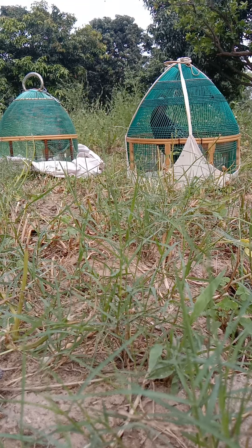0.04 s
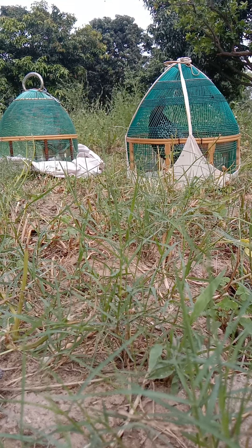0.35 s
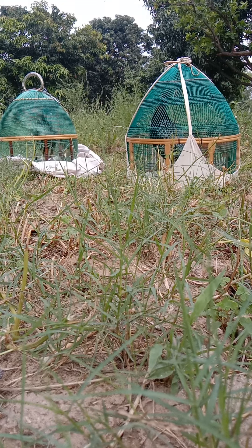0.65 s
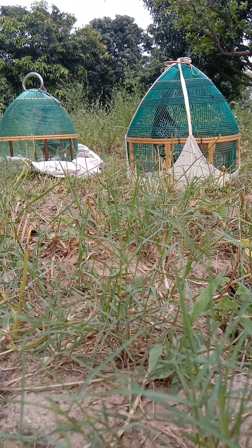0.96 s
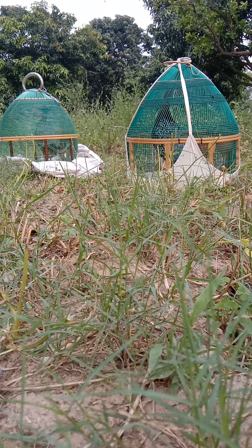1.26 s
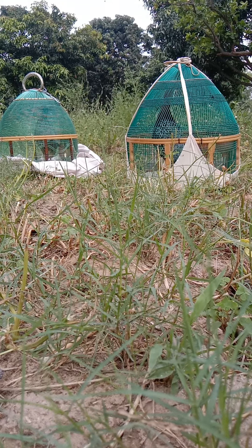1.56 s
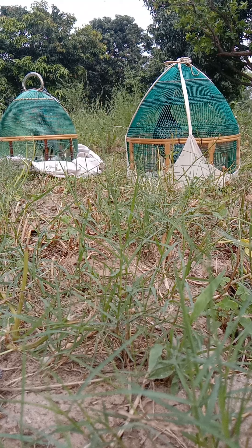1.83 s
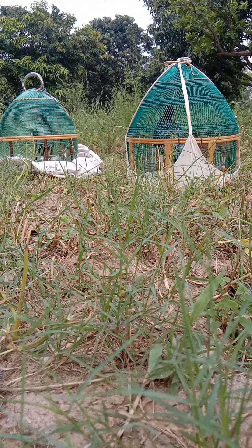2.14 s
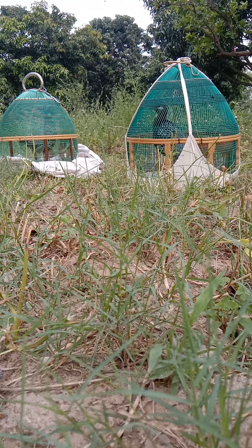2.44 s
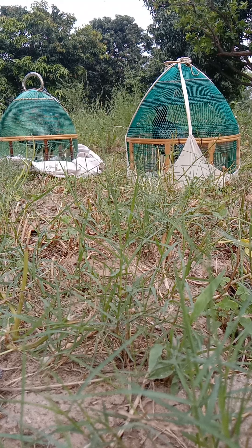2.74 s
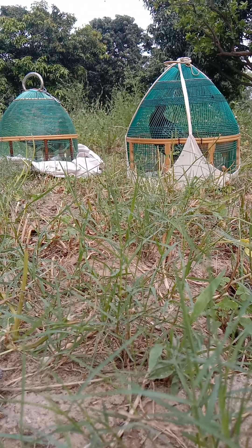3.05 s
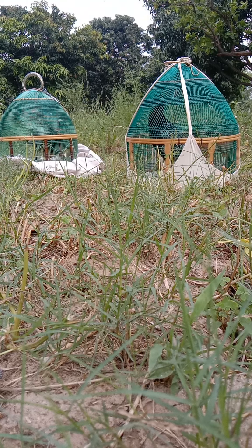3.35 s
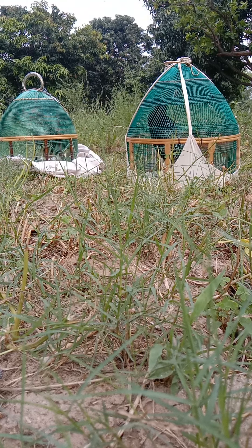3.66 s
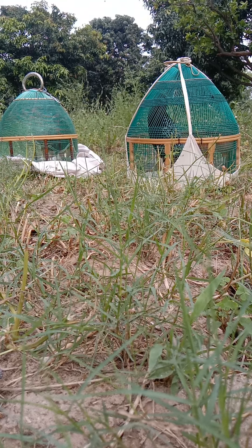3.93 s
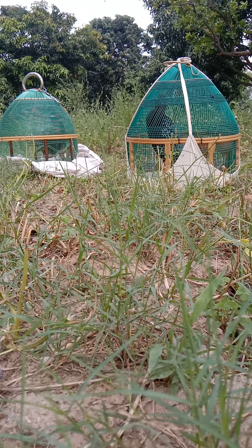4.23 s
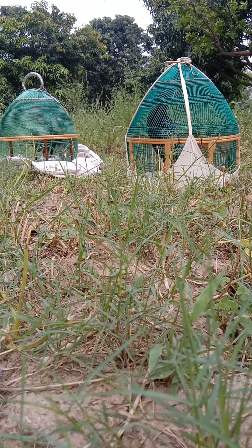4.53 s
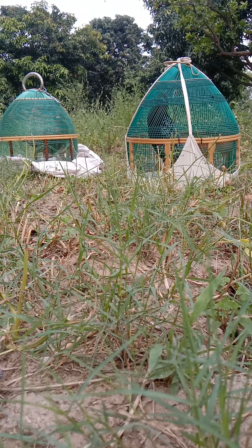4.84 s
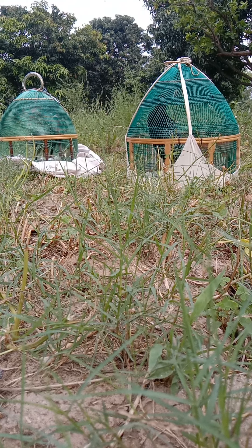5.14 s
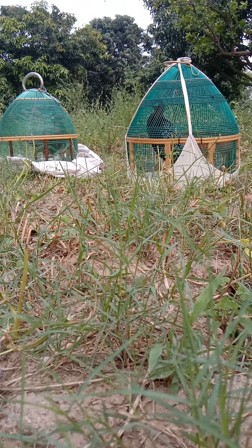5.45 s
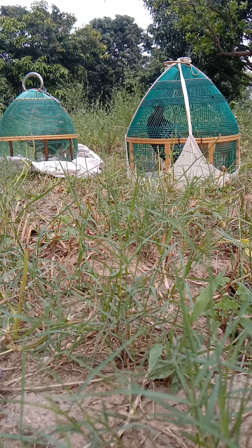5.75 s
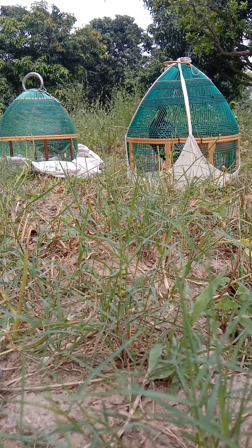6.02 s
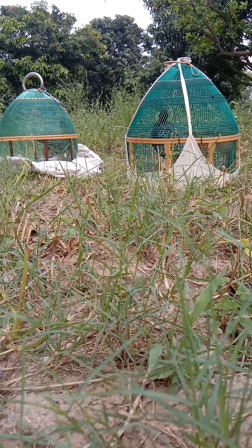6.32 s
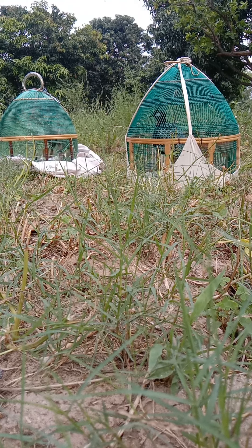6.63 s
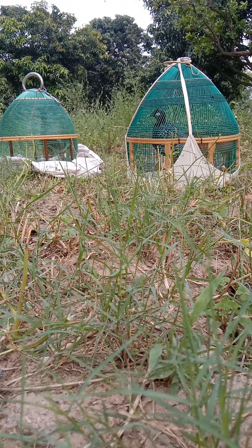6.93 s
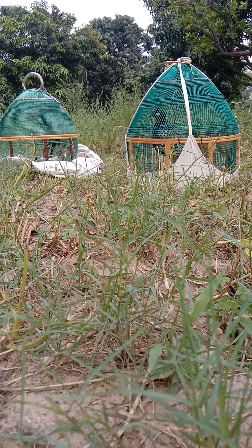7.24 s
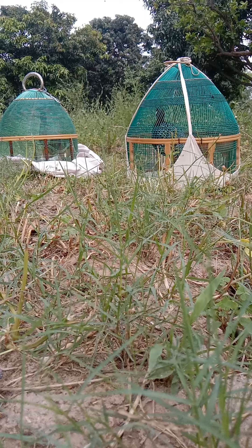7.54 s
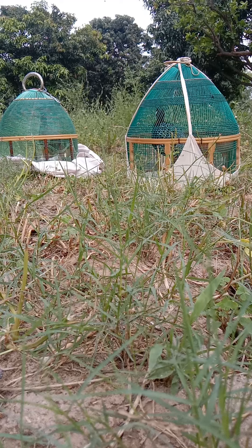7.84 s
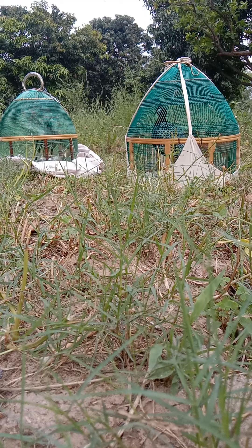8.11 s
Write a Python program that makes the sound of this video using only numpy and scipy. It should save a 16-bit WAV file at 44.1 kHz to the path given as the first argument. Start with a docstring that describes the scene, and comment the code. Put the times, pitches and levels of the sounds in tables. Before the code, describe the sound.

A caged francolin calls twice outdoors, each time a squeaky hiccup followed by four harsh rasping notes, over faint insects and distant birds.

```python
"""In a field, a caged francolin calls twice: a squeaky hiccup, then four harsh rasping notes.
The hiccup is a soft peep, a falling yelp and a high squeal from a membrane in the bird's voice box.
In a rasp the membrane flutters, making a fast train of falling chirps, and now and then it whistles.
The cage scatters the call, and the ground and trees send it back.
Behind it are insects, far birds and a low outdoor rumble."""
import sys
import numpy as np
from scipy import signal
from scipy.fft import rfft, irfft, next_fast_len
from scipy.io import wavfile
from scipy.ndimage import uniform_filter1d, minimum_filter1d, map_coordinates

SR = 44100
rng = np.random.default_rng(int(sys.argv[2]) if len(sys.argv) > 2 else 0)


def log_audio(samples):
    """Write samples as a 16-bit WAV file to the path given in sys.argv[1]."""
    # one column per channel
    frames = np.atleast_2d(samples).T
    # limit to full scale, then quantise
    limited = np.clip(frames, -1, 1)
    pcm = np.round(limited * 32767).astype(np.int16)
    wavfile.write(sys.argv[1], SR, pcm)


N = 360738

# Whistles that break through a rasp. Each row: start and end in seconds, pitch in Hz, level in dB.
RASP_WHISTLES = [(1.397, 1.417, 5718, -8), (1.411, 1.429, 6470, -16), (1.986, 1.996, 5820, -6.5),
                 (4.746, 4.774, 6660, -11.5), (5.331, 5.345, 6450, -12)]


def amp(db):
    """Turn decibels into a gain."""
    return 10 ** (np.asarray(db) / 20)


def unit(x):
    """Scale x to an average (rms) level of 1."""
    return x / np.sqrt(np.mean(x ** 2) + 1e-20)


def along(points, hz):
    """Read between (Hz, value) points, with every octave equally wide."""
    point_hz, values = np.transpose(points)
    return np.interp(np.log(hz + 1), np.log(point_hz), values)


def clock():
    """The time of every sample, in seconds."""
    return np.arange(N) / SR


def span(start, end):
    """A sound's sample numbers, its age in seconds and its progress from 0 to 1."""
    first = int(start * SR)
    at = np.arange(first, min(N, max(int(end * SR), first + 64)))
    return at, (at - first) / SR, np.linspace(0, 1, len(at))


def gate(t, start, end, edge):
    """1 between start and end, 0 outside, with ramps that last edge seconds."""
    return np.clip(np.minimum(t - start, end - t) / edge + .5, 0, 1)


def wobble(rate, size=N):
    """A smooth curve through rate random values a second."""
    values = rng.standard_normal(int(size * rate / SR) + 4)
    return map_coordinates(values, [np.arange(size) * rate / SR])


def filtered(x, response):
    """Multiply each frequency in x by response(hz)."""
    size = next_fast_len(N + SR // 2)
    return irfft(rfft(x, size) * response(np.fft.rfftfreq(size, 1 / SR)), size)[:N]


def resonate(x, gains, size=2048):
    """Pass x through a body with these (Hz, dB) gains; it rings after a sound, never before."""
    cepstrum = irfft(np.log(amp(along(gains, np.fft.rfftfreq(size, 1 / SR)))))
    cepstrum[1:size // 2] *= 2
    cepstrum[size // 2 + 1:] = 0
    return signal.oaconvolve(x, irfft(np.exp(rfft(cepstrum))))[:N]


def slide(x, speed):
    """Play x at a changing speed, which bends all its frequencies together."""
    return map_coordinates(x[:2 * len(speed)], [np.cumsum(speed)], order=3, mode="wrap")


def hiss(spectrum):
    """Noise shaped by (Hz, dB) points, at an average level of 1."""
    return unit(filtered(rng.standard_normal(N), lambda hz: amp(along(spectrum, hz))))


def whistle(hz, overtone_db, waver):
    """A wavering tone with up to three overtones and soft ends."""
    phase = 2 * np.pi * np.cumsum(hz * (1 + waver * wobble(920, size=len(hz)))) / SR
    tone = sum(amp(k * overtone_db) * np.sin((k + 1) * phase) * ((k + 1) * hz < SR / 2)
               for k in range(4))
    return np.sqrt(2) * tone * signal.windows.tukey(len(hz), min(1, .003 * SR / len(hz)))


def air(hush_db):
    """Open air: an uneven low rumble under a faint, even hush."""
    # Level of the low background noise over time. Each row: time in seconds, level in dB.
    low_levels = [(0.0, -74), (0.68, -61.5), (0.73, -75), (1.93, -66), (2.55, -77), (3.67, -69.5),
                  (3.74, -58.5), (4.35, -79.5), (4.49, -58), (4.78, -77.5), (4.85, -61), (5.38, -73),
                  (5.56, -57.5), (5.81, -77), (6.92, -68), (7.27, -80.5), (7.34, -68), (8.18, -71)]
    # The tone of the rumble and of the hush. Each row: frequency in Hz, relative level in dB.
    rumble_tone = [(18, -40), (30, -20.5), (45, -10), (68, -0.5), (135, -2), (210, -15.5), (330, -22.5),
                   (600, -50)]
    hush_tone = [(100, -20), (300, -2), (500, -4.5), (1300, -7.5), (2200, -16.5), (4000, -20), (6000, -21),
                 (9000, -39.5)]
    rumble_db = np.interp(clock(), *np.transpose(low_levels)) + 2.4 * wobble(15)
    return amp(rumble_db) * hiss(rumble_tone) + amp(hush_db) * hiss(hush_tone)


def insects(crickets_db, buzz_hz, buzz_db, buzz_every_s):
    """A wavering cricket chorus and one nearer insect buzzing in even bouts."""
    # The tone of the chorus. Each row: frequency in Hz, relative level in dB.
    cricket_tone = [(3650, -59), (6200, -31), (6430, -28), (6780, -7.5), (7190, 0.5), (8060, -20.5),
                    (8680, -8.5), (9480, -15.5), (9810, -17.5), (10200, -41.5), (15000, -37.5)]
    bouts = gate((clock() - .17) % buzz_every_s, start=.04, end=.29, edge=.08)
    buzz = unit(filtered(rng.standard_normal(N), lambda hz: 1 / (1 + ((hz - buzz_hz) / 80) ** 2)))
    chorus = amp(crickets_db + .8 * wobble(4.2) + wobble(30)) * hiss(cricket_tone)
    return chorus + amp(buzz_db) * bouts * buzz


def twitter(count, centre_hz, octaves, length_s, level_db):
    """Rows for far_birds: the faintest calls, at random times and pitches."""
    when, pitch, glide, faintness = rng.random((count, 4)).T
    start = when * (N / SR - 2 * length_s)
    first_hz = centre_hz * np.exp2(octaves * (pitch - .5))
    last_hz = first_hz * (1 + .15 * (glide - .5))
    return list(zip(start, start + length_s, first_hz, last_hz, level_db - 6 * faintness))


def far_birds(waver, flicker_db, edge_db, level_db):
    """Thin, distant gliding calls that swell and fade, broken up and blurred by the trees."""
    # The nearer calls. Each row: start and end in seconds, first and last pitch in Hz,
    # relative level in dB.
    nearer = [ (0.223, .40, 1200, 1295, -74), (0.725, .86, 1860, 1680, -70.5),
              (2.441, 2.62, 1213, 1304, -71), (2.883, 3.101, 1652, 1470, -68.5),
              (4.52, 4.664, 512, 532, -67.5), (4.834, 4.96, 1317, 1216, -65),
              (5.95, 6.117, 5250, 5450, -81), (6.254, 6.331, 3060, 3000, -70.5),
              (6.351, 6.512, 2990, 2840, -74), (6.382, 6.47, 2400, 2360, -76),
              (6.60, 6.791, 2970, 3127, -76), (6.821, 6.896, 3280, 3090, -66.5),
              (6.891, 7.00, 2380, 2280, -78), (6.888, 6.99, 1920, 1780, -75),
              (7.022, 7.16, 1090, 1133, -71), (7.201, 7.347, 1230, 1365, -66),
              (7.285, 7.375, 3000, 3000, -70), (7.688, 7.84, 538, 513, -76), (7.951, 8.03, 1800, 2100, -77),
              (8.088, 8.18, 1620, 1830, -74), ]
    faintest = twitter(count=14, centre_hz=3600, octaves=1.3, length_s=.13, level_db=-82)
    out = np.zeros(N)
    for start, end, first_hz, last_hz, db in nearer + faintest:
        at, _, progress = span(start, end)
        hz = (first_hz + (last_hz - first_hz) * progress) * (1 + waver * wobble(140, size=len(at)))
        tone = np.sin(2 * np.pi * np.cumsum(hz) / SR) * signal.windows.tukey(len(at), .2)
        swell_db = db + level_db - edge_db * np.abs(2 * progress - 1)
        out[at] += amp(swell_db + flicker_db * wobble(55, size=len(at))) * tone
    return out + amp(-5) * echo(out, gap_s=.0042)


def echo(x, gap_s):
    """Grass and trees scatter the sound; each frequency dies away at its own speed."""
    # The field's echo. Each row: frequency in Hz, seconds it takes to fade by 60 dB.
    fade_times = [(1200, 0.35), (2000, 0.21), (2900, 0.35), (4200, 0.32), (6200, 0.27), (9000, .27),
                  (14000, 0.15)]
    hz, t, noise = signal.stft(rng.standard_normal(SR // 2), SR, nperseg=256)
    fade = amp(-60 * t / along(fade_times, hz)[:, None])
    tail = signal.istft(noise * fade, SR, nperseg=256)[1]
    tail *= np.clip(np.arange(len(tail)) / SR / gap_s - .5, 0, 1)
    return signal.oaconvolve(x, tail / np.linalg.norm(tail))[:N]


def peeps(scoop, swell_db, waver):
    """A soft, reedy note scoops up to its pitch and swells."""
    # Each row is a peep: start and end in seconds, pitch in Hz, level in dB, step per overtone in dB.
    notes = [(.427, .434, 1796, -22, -2), (3.632, 3.652, 3934, -17, -9.5)]
    out = np.zeros(N)
    for start, end, hz, db, overtone_db in notes:
        at, _, progress = span(start, end)
        left = 1 - progress
        tone = whistle(hz * (1 - scoop * left ** 3), overtone_db, waver)
        out[at] += amp(db - swell_db * left ** 2) * tone
    return out


def yelps(scratch, drop, fade_db, pure_db, harsh_db, scratch_db, waver):
    """The membrane slackens: a pure tone falls, fades and turns harsh."""
    # Each row is a yelp: start and end in seconds, first pitch in Hz, level in dB.
    notes = [(0.432, 0.448, 2630, -11.5), (0.511, .519, 1944, -20), (3.65, 3.669, 2805, -5)]
    out = np.zeros(N)
    for start, end, hz, db in notes:
        at, age, progress = span(start, end)
        overtone_db = pure_db + (harsh_db - pure_db) * np.minimum(1.6 * progress, 1) ** 2
        tone = whistle(hz * (1 - drop * progress ** 2), overtone_db, waver)
        grit = amp(scratch_db) * np.sin(np.pi * progress ** 2) * scratch[at]
        out[at] += amp(db - fade_db * progress ** 1.8) * np.minimum(age / .0017, 1) * (tone + grit)
    return out


def squeals(scratch, rise_s, fall_s, climb, choke_at, choke_width, slack_db, scratch_db, waver):
    """The pitch leaps, holds while the tone chokes, then drops; the throat scratches going up and down."""
    # Each row is a squeal: start and end in seconds, held pitch in Hz, level in dB,
    # depth of the choke in dB, step per overtone in dB.
    notes = [(0.465, .503, 6252, -7, 13, -33.5), (.511, 0.517, 6550, -13, 1, -30.5),
             (3.6809, 3.718, 6670, -8, 13, -20.5)]
    out = np.zeros(N)
    for start, end, held_hz, db, choke_db, overtone_db in notes:
        at, age, progress = span(start, end)
        slack = np.minimum(np.exp(-age / rise_s) + np.exp(-((age[-1] - age) / fall_s) ** 2), 1)
        hz = held_hz * (1 + climb * (progress - .5)) * (1 - .78 * slack)
        dip_db = choke_db * np.exp(-((progress - choke_at) / choke_width) ** 2)
        grit = amp(scratch_db) * np.sqrt(slack * (1 - slack)) * scratch[at]
        tone = amp(slack_db * slack) * whistle(hz, overtone_db * (1 - slack / 2), waver)
        out[at] += amp(db - dip_db) * (tone + grit)
    return out


def flutter(voice, throat, start_s, fresh_hz, loss_hz_per_s, jitter, sweep_s, breath_share):
    """The membrane flutters, slowing as the bird tires; each flap is a chirp falling through the throat."""
    rate_hz = fresh_hz - loss_hz_per_s * np.clip(clock() - start_s, 0, 2)
    cycles = np.cumsum(rate_hz * np.exp(.06 * wobble(35) + jitter * wobble(260))) / SR
    slaps = np.diff(np.floor(cycles), prepend=0) * amp(1.9 * rng.standard_normal(N))
    breath = rng.standard_normal(N) * np.exp(-1.5 * (cycles % 1))
    source = np.sqrt(1 - breath_share) * unit(slaps) + np.sqrt(breath_share) * unit(breath)

    def chirp(hz):
        boost_db = sum(db * np.exp2(-(2 * (hz - centre) / width) ** 2) for centre, width, db in throat)
        gain = amp(along(voice, hz) + boost_db)
        # Low frequencies come last, and the chirp lingers in each resonance.
        delay = sweep_s * (1 - np.cumsum(gain ** 2) / np.sum(gain ** 2))
        return gain * np.exp(-2j * np.pi * np.cumsum(delay) * hz[1])
    return filtered(source, chirp)


def rasps(source, notes, level_db, croak_db, bend, sag, rise, droop_per_s):
    """Each note tightens out of a croak, brightens as the beak opens, tires and sags into a croak."""
    # The throat holds back deep sound. Each row: frequency in Hz, gain in dB.
    bass_cut = [(500, -32), (750, -18), (950, -6), (1250, 1)]
    attack_s, tiring_db_per_s, end_lift_db, end_lift_s = .013, 15, .5, .017
    beak_opening_s, shut_beak_db = .022, 6  # a shut beak weakens the upper resonance
    t = clock()
    upper = filtered(source, lambda hz: np.clip((hz - 3900) / 800, 0, 1))
    lower, upper = unit(source - upper), unit(upper)
    usual_hz = np.median([note[4] for note in notes])
    out = np.zeros(N)
    for start, end, note_db, upper_db, throat_hz, soft_db, opening_db, closing_db in notes:
        at = np.arange(int((start - .02) * SR), int((end + .03) * SR))
        now = t[at]
        age, left = np.maximum(now - start, 0), np.maximum(end - now, 0)
        push_db = note_db - soft_db * np.exp(-age / attack_s) - tiring_db_per_s * age
        push_db += end_lift_db * np.exp(-left / end_lift_s)
        shut = np.exp(-age / beak_opening_s)
        upper_share = np.clip(amp(upper_db - shut_beak_db * shut) ** 2, .05, .95)
        opening = np.clip(1 - (now - start - .004) / .014, 0, 1) * np.clip(amp(opening_db + 26.5), 0, 1)
        closing = np.clip(1 - left / .02, 0, 1)
        slack = np.clip(opening + closing, 0, 1)
        speed = (throat_hz / usual_hz) ** bend
        arch = 1 - rise * shut - droop_per_s * (age - left) / 2  # climbs, then droops
        high = slide(upper[at[0]:], speed * arch) * np.sqrt(upper_share)
        low = slide(lower[at[0]:], speed * (1 + .02 * shut)) * np.sqrt(1 - upper_share)
        voice = high + low * (1 - slack / 2)
        out[at] += amp(push_db + level_db) * voice * gate(now, start + .002, end - .005, edge=.006)
        # A slack membrane croaks up to about an octave under the lower resonance.
        slowed = slide(lower[at[0]:], 1 - sag * slack)
        croak = resonate(slowed, bass_cut)[:len(at)]
        strength = np.sqrt(opening) * amp(opening_db) + np.sqrt(closing) * amp(closing_db)
        out[at] += amp(croak_db) * strength * croak * gate(now, start + .00067, end + .0057, edge=.006)
    for start, end, _, _ in RASP_WHISTLES:  # the flutter stops while the membrane whistles
        out *= 1 - gate(t, start, end - .002, edge=.0033)
    return out


def rasp_whistles(scoop, rise_s, sag, edge_db, overtone_db, waver):
    """Inside a rasp the membrane locks into one tone, which scoops up, swells and sags as it fades."""
    out = np.zeros(N)
    for start, end, hz, db in RASP_WHISTLES:
        at, age, progress = span(start, end)
        arch = 1 - scoop * np.exp(-age / rise_s) - sag * progress ** 3
        out[at] += amp(db - edge_db * (2 * progress - 1) ** 2) * whistle(hz * arch, overtone_db, waver)
    return out


def francolin():
    """Two calls, each a hiccup and four rasps, shaped by the throat and beak."""
    # The tone of each call; the lowest row adds faint low noise beneath it.
    # Each row: frequency in Hz, relative level in dB.
    voice_1 = [(300, -50), (700, -55.5), (1050, -55.5), (1450, -19), (2150, -19), (2600, -2.5),
               (5950, -0.5), (6200, -9), (7500, -13), (8500, -28.5), (10600, -29), (11000, -43),
               (12600, -39), (15300, -29.5)]
    voice_2 = [(300, -52), (600, -56.5), (880, -52), (1150, -25), (1450, -18.5), (2000, -15.5),
               (2500, -3.5), (3650, -6.5), (4400, 3), (5900, -1.5), (7000, -6), (8000, -20.5),
               (10000, -22.5), (11800, -43), (13400, -28)]
    # Resonances, where throat and beak ring. Each row: centre in Hz, width in Hz, boost in dB.
    throat_1 = [(2782, 340, 10.5), (3313, 72, 10), (4127, 170, 7), (4820, 230, 6), (5324, 120, 11.5),
                (5680, 370, 5)]
    throat_2 = [(2995, 290, 13), (3373, 160, 6.9), (5137, 380, 9), (5591, 260, 10), (6540, 170, 2.1)]
    # The rasps. Each row: start and end in seconds, relative level in dB, upper resonance's share in dB,
    # lower resonance in Hz (only to bend notes against each other), softening of the start in dB,
    # relative levels of the opening and closing croaks in dB.
    notes = [ (.890, 1.049, -14, -2.5, 2909, 2, -39, -32), (1.241, 1.457, -10, -3.5, 2807, 7.5, -24.5, -27),
             (1.752, 1.833, -11.5, -2, 2766, 8, -27, -28),
             (1.91, 2.084, -11.5, -2.5, 2793, 6, -23.5, -29.5),
             (4.201, 4.366, -12.5, -1.5, 3029, 5.5, -33, -33), (4.54, 4.8, -10, -1.5, 2902, 6, -20, -29),
             (5.087, 5.195, -11.5, -1.55, 2938, 8, -24.5, -30.5),
             (5.257, 5.417, -11, -1.5, 2978, 0, -17.5, -30.5), ]
    first = flutter(voice_1, throat_1, start_s=notes[0][0], fresh_hz=274.2, loss_hz_per_s=14,
                    jitter=.06, sweep_s=.005, breath_share=.24)
    second = flutter(voice_2, throat_2, start_s=notes[4][0], fresh_hz=279.1, loss_hz_per_s=22,
                     jitter=.055, sweep_s=.0036, breath_share=.18)
    harsh = rasps(first, notes[:4], level_db=-.6, croak_db=-2.5,
                  bend=.7, sag=.44, rise=.06, droop_per_s=.06)
    harsh += rasps(second, notes[4:], level_db=-.56, croak_db=-1,
                   bend=1.1, sag=.52, rise=.16, droop_per_s=.38)
    scratch = unit(filtered(second, lambda hz: amp(along([(1200, 11), (3000, 3), (5000, -.5)], hz))))
    tones = peeps(scoop=.13, swell_db=14, waver=.016)
    tones += yelps(scratch, drop=.69, fade_db=29, pure_db=-28.5, harsh_db=-4.5, scratch_db=-1, waver=.02)
    tones += squeals(scratch, rise_s=.0018, fall_s=.004, climb=.04, choke_at=.42, choke_width=.14,
                     slack_db=-15, scratch_db=-3, waver=.014)
    tones += rasp_whistles(scoop=.09, rise_s=.0045, sag=.019, edge_db=9.5, overtone_db=-32.5, waver=.012)
    return harsh + resonate(tones, [(600, -41.5), (950, -15), (1350, -1.5)])


def cage(x, ring_s, low_db, high_db):
    """Mesh, bars and grass scatter the call within milliseconds, the treble most."""
    t = np.arange(SR // 30) / SR
    spray = rng.standard_normal(len(t)) * amp(-60 * t / ring_s) * (t > .0006)
    scattered = signal.oaconvolve(x, spray / np.linalg.norm(spray))[:N]
    share = lambda hz: amp(along([(3200, low_db), (8000, high_db)], hz))
    direct = filtered(x, lambda hz: np.sqrt(1 - share(hz) ** 2))
    return direct + filtered(scattered, share)


def ground_bounce(x, delay_s):
    """The ground sends back one late, quieter copy of the call."""
    gains = [(1500, -21.5), (5500, -9), (12000, -16)]
    return filtered(x, lambda hz: amp(along(gains, hz)) * np.exp(-2j * np.pi * hz * delay_s))


def scene():
    """The bird in its cage, one near reflection, the field's echo and the background."""
    bird = cage(francolin(), ring_s=.028, low_db=-13, high_db=-2.5)
    echo_gains = [(1500, -21.5), (3000, -14.5), (4200, -14), (6000, -6.5), (12000, -9)]
    field_echo = filtered(echo(bird, gap_s=.0071), lambda hz: amp(along(echo_gains, hz)))
    background = far_birds(waver=.018, flicker_db=4.5, edge_db=10, level_db=1.5)
    background += insects(crickets_db=-72, buzz_hz=4320, buzz_db=-81, buzz_every_s=.634)
    background += air(hush_db=-80)
    return bird + ground_bounce(bird, delay_s=.018) + field_echo + background


def record(dry):
    """A fast limiter turns down the loudest peaks, and the highest treble is cut off."""
    ceiling, top_hz = .88, 15650
    needed = np.minimum(1, ceiling / (np.abs(dry) + 1e-9))
    held = minimum_filter1d(needed, size=161)
    gain = uniform_filter1d(uniform_filter1d(held, size=81), size=81)
    return filtered(dry * gain, lambda hz: 1 / (1 + (hz / top_hz) ** 200))


dry = scene()
out = record(dry)
log_audio(out)
```